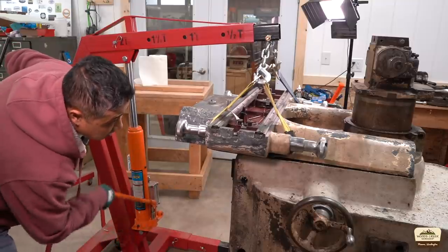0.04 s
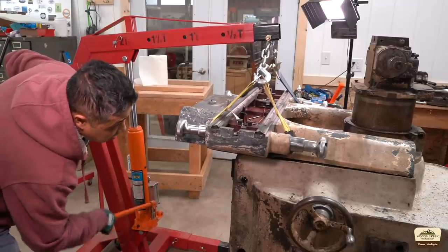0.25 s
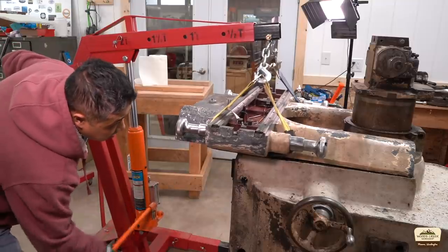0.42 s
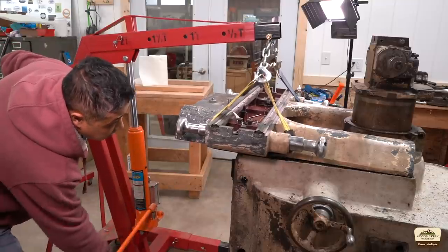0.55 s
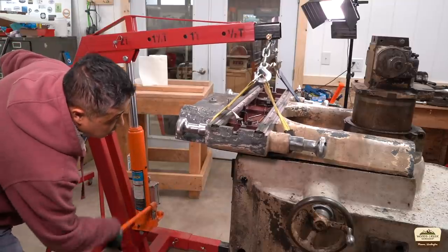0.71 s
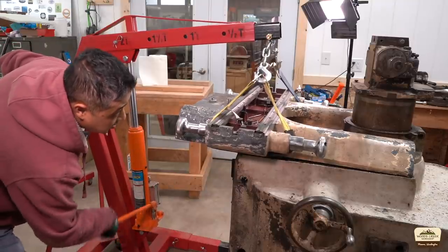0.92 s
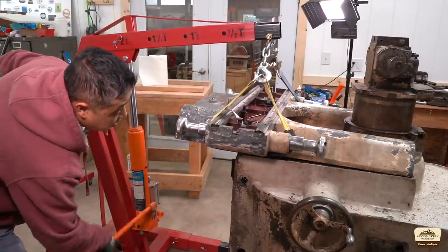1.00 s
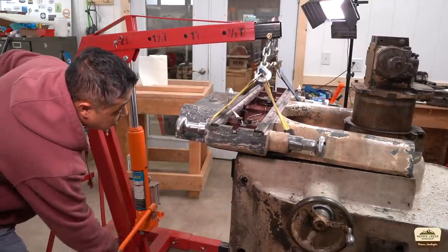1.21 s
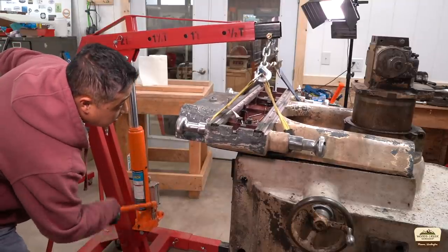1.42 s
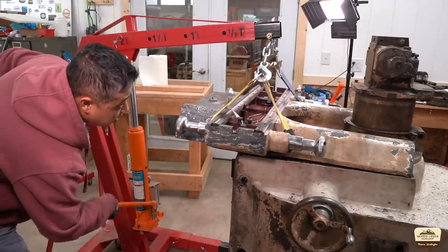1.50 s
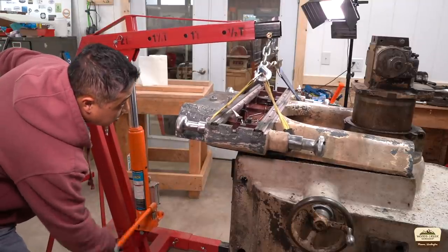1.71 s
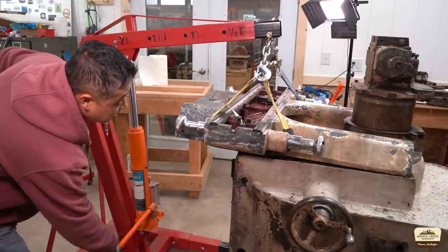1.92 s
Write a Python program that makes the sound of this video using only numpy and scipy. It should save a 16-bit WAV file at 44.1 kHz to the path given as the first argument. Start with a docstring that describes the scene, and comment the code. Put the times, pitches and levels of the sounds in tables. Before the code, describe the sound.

A hand-pumped hydraulic hoist gives a sharp steel clank, then lighter knocks and pin clicks. Its heavy load bumps dully and slips once in a low creak before a last knock, heard close in a small, quiet workshop.

```python
"""A hand-pumped hydraulic hoist takes up a heavy machine part, heard close on one microphone.
At the stroke ends the loose steel handle clanks in its socket and knocks the frame; link pins click
and chink, and joints tick as they take up play. Each blow is a short clatter and a ring of steel.
The load bumps dully and once sticks and slips in a low shuddering creak that leaves the hoist humming.
Behind it are the short reverberation and the quiet air of a small workshop."""
import sys
import numpy as np
from scipy import signal
from scipy.fft import rfft, irfft, next_fast_len
from scipy.io import wavfile

SR = 44100
rng = np.random.default_rng(int(sys.argv[2]) if len(sys.argv) > 2 else 0)


def wav_out(sig):
    """Save sig, one row per channel (or a flat mono array), as 16-bit PCM at SR to the path in sys.argv[1]."""
    wavfile.write(sys.argv[1], SR, np.round(np.clip(np.atleast_2d(sig).T, -1, 1) * 32767).astype(np.int16))


N = 85995

# Blows on each part (t/s, level/dB, tilt/dB per octave, clatter length/x)
PIN_CLICKS = [(0.0, -57.5, -3, 2.2), (.718, -40.5, -4.5, 0.61), (0.7277, -41, 0, 1.17),
              (0.9618, -45.5, -4.5, 1.6), (0.988, -37.5, -2.5, 0.59), (1.3365, -26.5, -0.5, 0.18),
              (1.3453, -33.5, 3, 0.81), (1.629, -44.5, -8.5, 0.9)]
HANDLE_CLANKS = [(0.177, -55, -5, 1.6), (0.2022, -29, -7.5, 1.37), (.2068, -15.5, 4.5, 0.93),
                 (.232, -45, 16.5, 2.1), (.288, -48, -4, 3)]
FRAME_KNOCKS = [(.177, -52, -2.5, 0.92), (.208, -30, 3, 1.77), (.26, -31, 1, 0.9), (.378, -50.5, -4, 1.34),
                (0.554, -59, -3.5, 3), (.652, -58.5, -5, 2.8), (0.69, -59, 1.5, 2.9),
                (.729, -52.5, -6.5, 1.52), (0.956, -43, 1, 0.76), (0.961, -37.5, 3, 0.72),
                (0.994, -36, -2.5, 0.3), (1.0002, -31.5, 0, 1.31), (1.26, -51, 2.5, 1.7),
                (1.344, -51.5, -1.5, 1.5), (1.617, -47, 1.5, 1.3), (1.636, -30.5, 0, 1.09),
                (1.94, -58.5, 3, 1.14)]
LOAD_BUMPS = [(.23, -40, 12, 0.64), (.264, -47, 0.5, 0.87), (0.403, -45.5, -5, 0.54), (0.56, -54.5, 1, 1.7),
              (1.0, -45.5, 15.5, 0.87), (1.308, -59, -6, 0.49), (1.638, -48, -1.5, 1.7)]
LINK_CHINKS = [(0.252, -40.5, -10, 0.89), (0.299, -59.5, -1, 0.29), (0.7359, -58, 15, 0.38),
               (0.9968, -37.5, -9, 0.4), (1.006, -50, -14, 1.54), (1.309, -55.5, -16.5, 0.54),
               (1.353, -45, -10, 0.65), (1.628, -33, -4, 0.58), (1.633, -37.5, -11.5, 0.7)]
# Joints taking up play (t/s, level/dB, ring f/Hz, tilt/dB per octave)
JOINT_TICKS = [(0.0906, -40.5, 3335, 0), (0.6521, -47, 2700, -4.5), (0.9104, -46, 3360, -0.5),
               (1.4816, -46.5, 5210, 1.5), (1.5815, -42, 5490, -2.5)]
# Two faint low creaks and a brief, thin high hiss (t/s, level/dB, f/Hz, t60/s)
CREAKS_AND_HISS = [(.534, -46, 626, 0.093), (.567, -74.5, 10110, 0.46), (1.804, -56, 402, 0.38)]
# Slips of the load within its low creak (t/s, level/dB, tilt/dB per octave)
LOAD_SLIPS = [(1.1823, -35, 5), (1.2028, -31, -0.5), (1.2109, -40, 5), (1.234, -49, 9.5),
              (1.259, -53, -6.5)]

# Dense, quickly damped vibration of each part (f/Hz, octave level/dB, t60/s)
PIN_CLATTER = [(200, -27.5, 0.16), (1900, -13, 0.14), (2710, -3.5, 0.17), (5550, -3, 0.096),
               (7250, -4, 0.13), (8700, -7, 0.09), (10170, -19.5, 0.074), (14790, -29.5, .09)]
HANDLE_CLATTER = [(149, -52, 0.22), (510, -16, 0.028), (1390, -24.5, 0.027), (2750, -8, 0.067),
                  (3550, 4.5, 0.038), (4010, -4, 0.02), (5000, 7, 0.011), (5850, -8.5, .065),
                  (6760, -7, .06), (7700, -6, 0.042), (9970, -19.5, 0.055), (15200, -29.5, 0.084)]
FRAME_CLATTER = [(90, -36, 0.073), (200, -22, 0.27), (407, -8.5, 0.26), (756, -7, 0.11), (1347, 0.5, 0.15),
                 (1820, -4, 0.2), (2830, -6, 0.13), (4890, -6, 0.091), (8720, -21.5, 0.015),
                 (15000, -29, 0.12)]
LOAD_CLATTER = [(61.9, -32, 0.4), (92, -10.5, 0.46), (215, -8, 0.39), (487, -7.5, 0.068),
                (670, -23.5, 0.14), (2020, -37, .1)]
LINK_CLATTER = [(2003, -29, 0.022), (6170, -7.5, 0.32), (7570, -7.5, 0.2), (9460, 14.5, 0.052),
                (10620, -1.5, 0.12), (12300, -5.5, 0.37), (15760, -15.5, 0.097)]
# Ringing modes of each part, and of the whole hoist (f/Hz, level/dB, t60/s)
PIN_RING = [(2700, -20, .2), (3365, -14, .25), (3492, -14.5, .27), (5190, -12.5, .12), (5290, -14, .13),
            (5445, -13, .12), (6130, -19, .15)]
HANDLE_RING = [(3378, -17, .2), (3474, -6.5, .19), (3555, -13, .18), (3862, -17, .28), (3975, -14, .29),
               (4059, -17, .3), (4192, -13, .28), (4290, -17, .27), (6018, -1, .04)]
FRAME_RING = [(428, -23, .3), (587, -14, .18), (730, -15, .17), (972, -15, .33), (1202, -18, .42),
              (1269, -11, .2), (1323, -19, .55), (1350, -8.5, .15), (1384, -20, .55), (1639, -16, .2),
              (1837, -13, .28), (1877, -15, .23), (2046, -17, .3)]
HOIST_RING = [(81, -17, .7), (90, -15, .4), (123, -9, .6), (194, -13, .7), (225, -9, .26), (291, -20, .8),
              (337, -20, 1.0), (382, -24, .35), (488, -21, .3)]
LINK_RING = [(8540, -13, .12), (8850, -7.5, .13), (9260, -13, .15), (11330, -16, .1)]
# Damped resonances that each slip kicks (f/Hz, level/dB, t60/s)
SLIP_RING = [(124.4, -2, 0.34), (221, 2, 0.069), (353, -11, 0.1), (466, -9, 0.075)]

# Room tone at the microphone (f/Hz, octave level/dB)
ROOM_AIR = [(25, -94), (55, -81.5), (100, -72.5), (250, -76), (600, -70), (1300, -74.5), (3500, -79),
            (8000, -76.5), (15000, -83.5)]
# Workshop reverberation (f/Hz, level/dB, t60/s)
ROOM_REVERB = [(100, -8, 0.74), (407, -6.5, 0.4), (1430, -11, 0.37), (4000, -8, 0.45), (8740, -11.5, 0.38),
               (15000, -9.5, 0.19)]

LOAD_HZ = 203  # centre of the load's rumble
GRAIN_DB, GRAIN_HZ = 1.5, 594  # depth and rate of contact chatter
BLUR_RAD, BLUR_HZ = 1, 131.4  # phase jitter from loose joints
TWIN_SPLIT, TWIN_DB = 0.011, -3  # relative pitch spread and level of twin modes


def undb(db):
    """Decibels to gain."""
    return 10 ** (np.asarray(db) / 20)


def at(table, hz, column=1):
    """A column of a table, read on a log-frequency axis."""
    table = np.array(table, float)
    return np.interp(np.log(hz), np.log(table[:, 0]), table[:, column])


def fade(t60):
    """Exponential decay, lasting until it is 60 dB down."""
    t60 = np.clip(t60, 20 / SR, N / SR)
    return np.exp(-np.log(1000) * np.arange(min(int(t60 * SR), N)) / SR / t60)


def add(out, start, sound):
    """Mix a sound in at a time in seconds."""
    i = int(np.clip(start * SR, 0, N - 1))
    out[i:i + len(sound)] += sound[:N - i]


def soften(sound, rise_s):
    """Round the onset over a rise time."""
    return sound * (1 - np.exp(-np.arange(len(sound)) / SR / rise_s))


def wobble(size, hz):
    """Random values joined by lines, hz of them a second."""
    steps = np.arange(size) / SR * hz
    return np.interp(steps, np.arange(N // 20), rng.standard_normal(N // 20))


def noise_bands():
    """Centres and noises of quarter-octave bands; each octave has unit power."""
    edges = 22 * 2 ** (np.arange(40) / 4)
    size = next_fast_len(N)
    f, white = np.fft.rfftfreq(size, 1 / SR), rfft(rng.standard_normal(size))
    masks = [(f >= lo) & (f < hi) for lo, hi in zip(edges, edges[1:])]
    bands = np.array([irfft(white * mask, size)[:N] for mask in masks])
    return np.sqrt(edges[1:] * edges[:-1]), bands / bands.std(axis=1, keepdims=True) / 2


def clatter(noise, body, tilt_db, length, pivot_hz):
    """Countless damped modes of a struck part, grainy from chattering contact."""
    (hz, bands), size = noise, N // 4
    out, i = np.zeros(size), rng.integers(N - size)
    skirts = np.minimum(1, np.minimum(hz / body[0][0], body[-1][0] / hz)) ** 2
    gains = skirts * undb(at(body, hz) + tilt_db * np.clip(np.log2(hz / pivot_hz), -2, 2))
    for band, gain, t60 in zip(bands, gains, at(body, hz, column=2)):
        decay = fade(t60 * length)[:size]
        add(out, 0, gain * band[i:i + len(decay)] * decay)
    return out * undb(GRAIN_DB * wobble(size, GRAIN_HZ))


def ring(modes, tilt_db, pivot_hz, scatter=1):
    """Decaying partials; scatter spreads their starting phases, and loose joints blur the high ones."""
    out, blur = np.zeros(N // 2), wobble(N, BLUR_HZ)
    for (hz, db, t60), phase in zip(modes, scatter * rng.uniform(0, 2 * np.pi, len(modes))):
        decay, i = fade(t60)[:N // 2], rng.integers(N // 2)
        jitter = BLUR_RAD * min(hz / 4000, 1) * blur[i:i + len(decay)]
        angle = 2 * np.pi * hz / SR * np.arange(len(decay)) + phase + jitter
        add(out, 0, undb(db + tilt_db * np.log2(hz / pivot_hz)) * decay * np.sin(angle))
    return np.sqrt(2) * out


def twinned(modes):
    """Handle and pins are not quite round: each mode beats with a weaker twin close in pitch."""
    twins = [(hz * (1 + TWIN_SPLIT * rng.standard_normal()), db + TWIN_DB, t60) for hz, db, t60 in modes]
    return list(modes) + twins


def blows(noise, events, body, modes, pivot_hz, rise_s, ring_db):
    """Every blow on one steel part: a short clatter and its modes; a deadened blow rings less."""
    out = np.zeros(N)
    for start, db, tilt, length in events:
        blow = undb(ring_db) * min(length, 1) ** 2 * ring(modes, tilt, pivot_hz)
        add(blow, 0, clatter(noise, body, tilt, length, pivot_hz))
        add(out, start, undb(db) * soften(blow, rise_s))
    return out


def room_air():
    """Steady, quiet air all round the microphone."""
    return sum(undb(at(ROOM_AIR, hz)) * band for hz, band in zip(*noise_bands()))


def pin_clicks(noise):
    """Link pins are struck and ring briefly in the treble."""
    return blows(noise, PIN_CLICKS, PIN_CLATTER, twinned(PIN_RING),
                 pivot_hz=4200, rise_s=0.00035, ring_db=1.5)


def joint_ticks(noise):
    """Light contacts as play is taken up: a crisp clatter and one brief ring of the joint."""
    out = np.zeros(N)
    for start, db, hz, tilt in JOINT_TICKS:
        tick = ring(twinned([(hz, -7, 0.051)]), 0, hz)  # one mode: f/Hz, level/dB, t60/s
        add(tick, 0, clatter(noise, PIN_CLATTER, tilt, length=1, pivot_hz=hz))
        add(out, start, undb(db - 6) * tick)
    return out


def handle_clanks(noise):
    """The loose steel handle strikes its socket and rings brightly."""
    return blows(noise, HANDLE_CLANKS, HANDLE_CLATTER, twinned(HANDLE_RING),
                 pivot_hz=4000, rise_s=0.00082, ring_db=-2)


def frame_knocks(noise):
    """The frame takes the handle's knocks and rings in the midrange."""
    return blows(noise, FRAME_KNOCKS, FRAME_CLATTER, FRAME_RING,
                 pivot_hz=1200, rise_s=0.00076, ring_db=2)


def load_bumps(noise):
    """The shifting load bumps softly and sets the hoist's low modes humming."""
    return blows(noise, LOAD_BUMPS, LOAD_CLATTER, HOIST_RING, pivot_hz=LOAD_HZ, rise_s=0.018, ring_db=4)


def link_chinks(noise):
    """Small hard contacts in the linkage ring high and thin."""
    return blows(noise, LINK_CHINKS, LINK_CLATTER, LINK_RING, pivot_hz=7720, rise_s=0.00025, ring_db=8.5)


def creaks_and_hiss():
    """Fading tones of jittering pitch: the two low ones creak faintly, the high one blurs into a hiss."""
    out = np.zeros(N)
    for start, db, hz, t60 in CREAKS_AND_HISS:
        decay = fade(t60)
        pitch = hz * (1 + 0.088 * wobble(len(decay), hz=258.5))
        tone = np.sqrt(2) * np.sin(2 * np.pi * np.cumsum(pitch) / SR)
        add(out, start, undb(db) * soften(decay * tone, rise_s=0.0022))
    return out


def load_creak(noise):
    """The load sticks and slips a few times, each slip shaking the whole hoist."""
    out = np.zeros(N)
    for start, db, tilt in LOAD_SLIPS:
        kick = ring(SLIP_RING, tilt, LOAD_HZ, scatter=0)
        hum = undb(-3) * ring(HOIST_RING, tilt, LOAD_HZ)
        rasp = undb(-2) * clatter(noise, LOAD_CLATTER, tilt, length=1, pivot_hz=LOAD_HZ)
        add(kick, 0, rasp)
        add(out, start, undb(db) * soften(kick + hum, rise_s=0.0018))
    return out


def workshop(direct):
    """Direct sound, then weaker diffuse reflections that build quickly and die sooner in the treble."""
    tail = np.zeros(N)
    for hz, band in zip(*noise_bands()):
        t60 = at(ROOM_REVERB, hz, column=2)
        decay = fade(t60)
        unity_gain = np.sqrt(4 * np.log(2) * np.log(1000) * hz / t60) / SR
        add(tail, 0, band[:len(decay)] * decay * undb(at(ROOM_REVERB, hz)) * unity_gain)
    return direct + signal.fftconvolve(direct, soften(tail, rise_s=0.023))[:N]


def scene():
    """The hoist close by, the workshop and its air behind, in mono."""
    noise = noise_bands()
    struck = handle_clanks(noise) + frame_knocks(noise) + pin_clicks(noise) + link_chinks(noise)
    bumps = load_bumps(noise)
    air = room_air()
    hoist = struck + bumps + joint_ticks(noise) + load_creak(noise) + creaks_and_hiss()
    return (workshop(hoist) + air)[None]


def record(dry):
    """The microphone sheds the bass below 60 Hz and cuts the top above 16.1 kHz."""
    low_cut = signal.butter(3, 60, "high", fs=SR, output="sos")
    top_cut = signal.ellip(10, 0.2, 70, 16100, fs=SR, output="sos")
    return signal.sosfilt(top_cut, signal.sosfilt(low_cut, dry))


dry = scene()
out = record(dry)
wav_out(out)
```